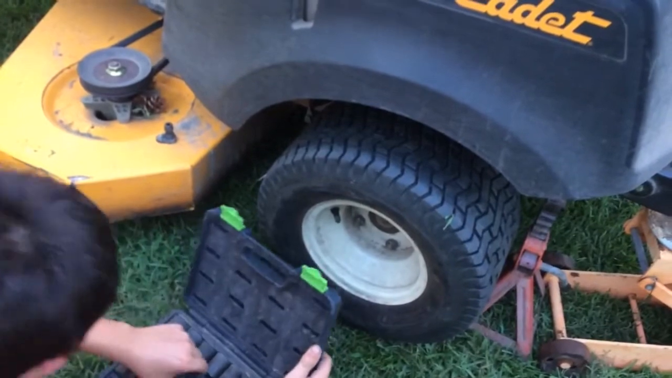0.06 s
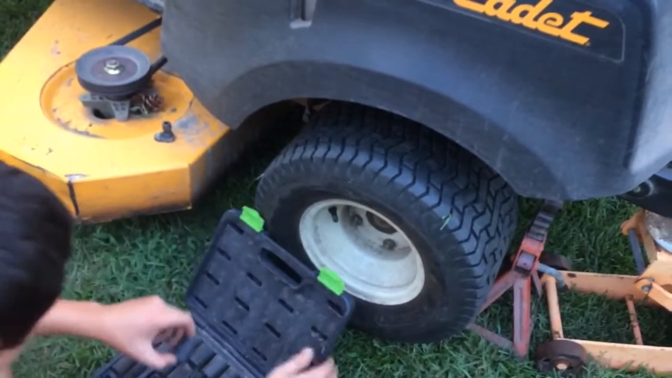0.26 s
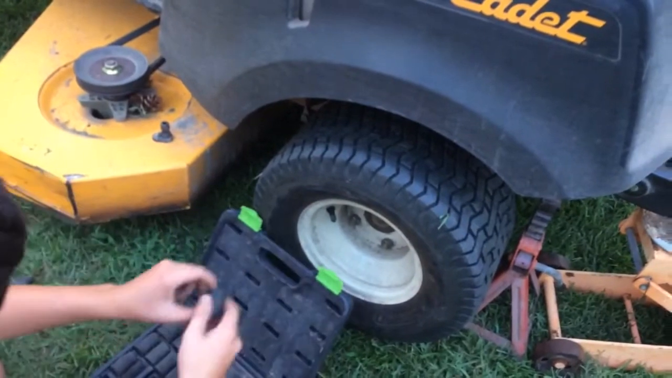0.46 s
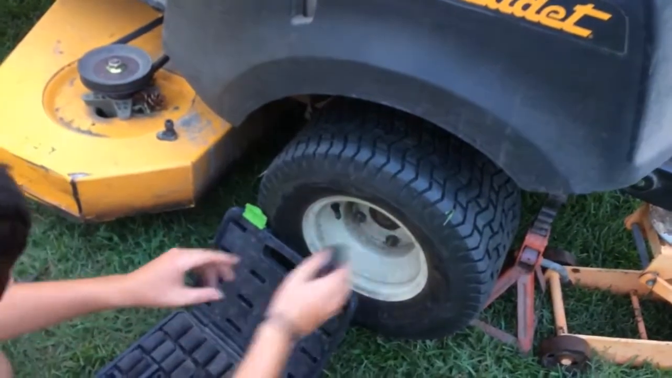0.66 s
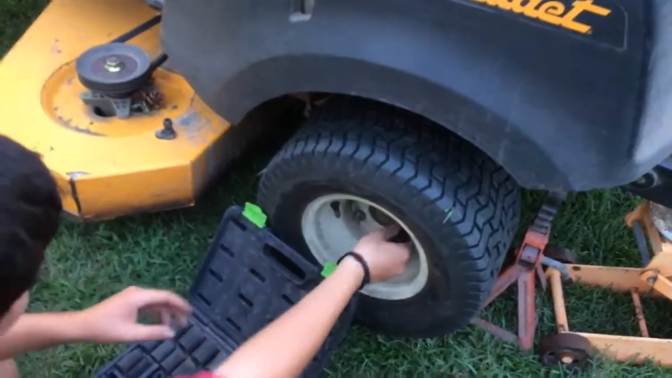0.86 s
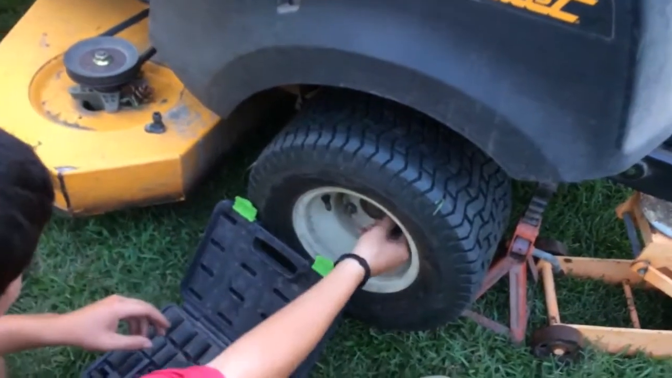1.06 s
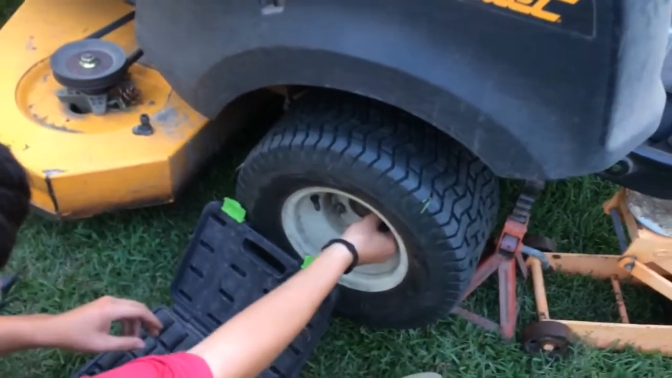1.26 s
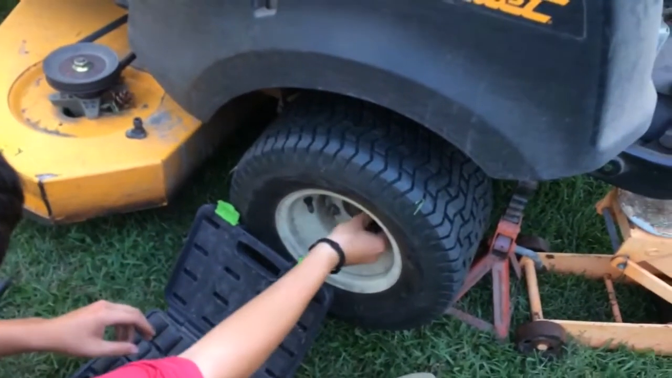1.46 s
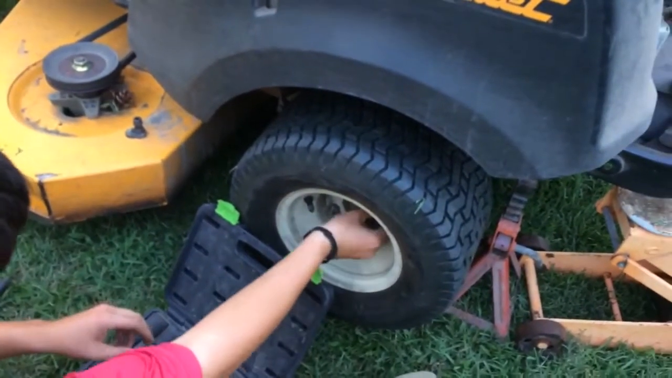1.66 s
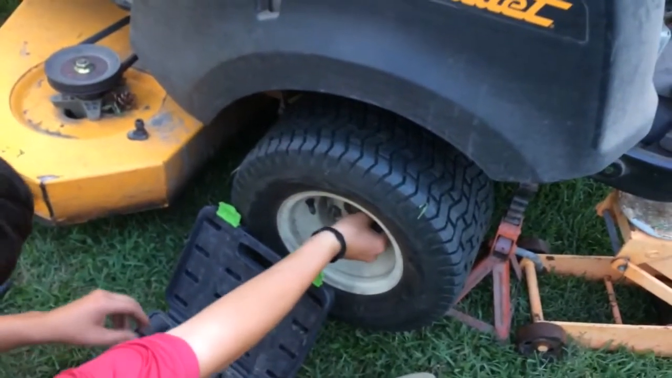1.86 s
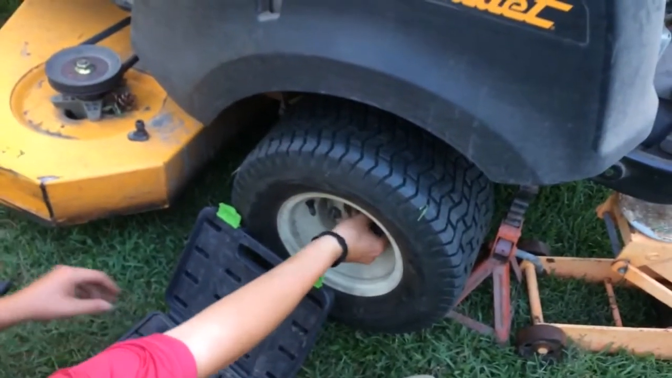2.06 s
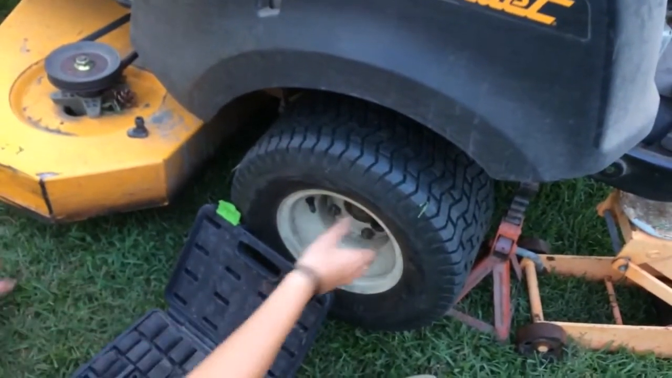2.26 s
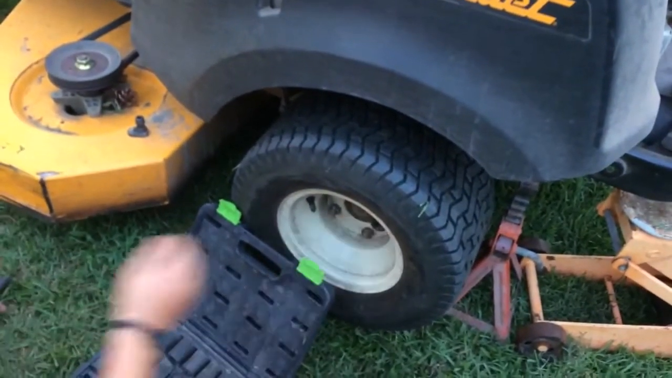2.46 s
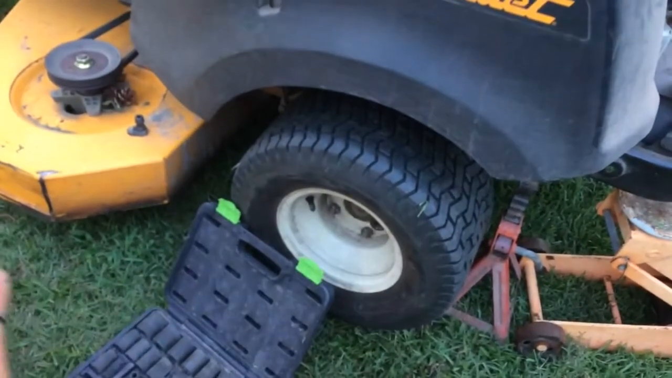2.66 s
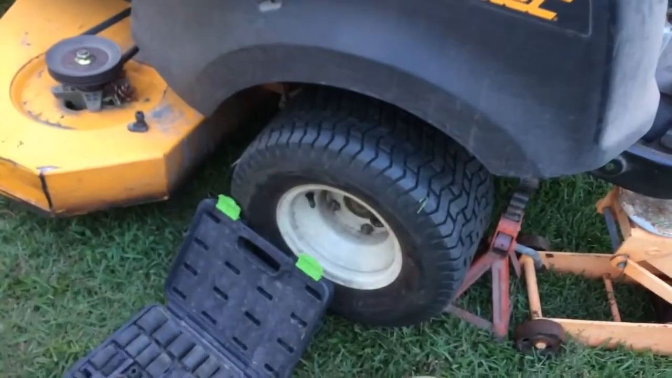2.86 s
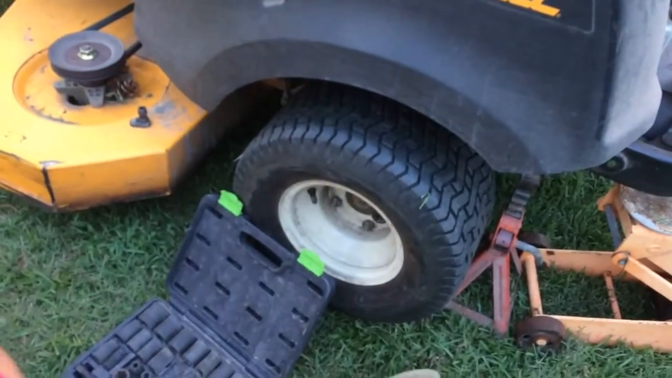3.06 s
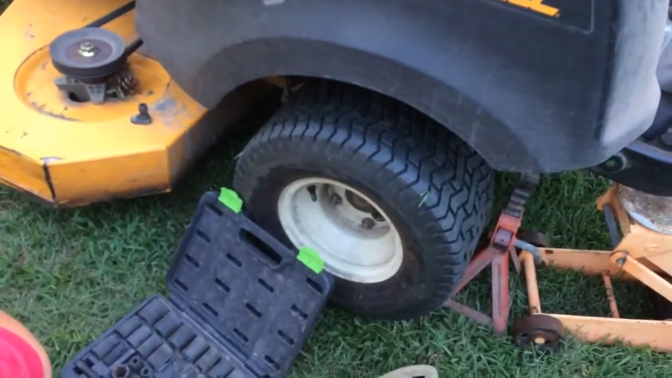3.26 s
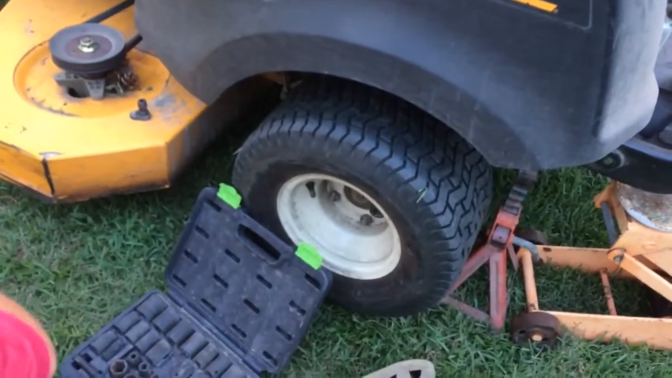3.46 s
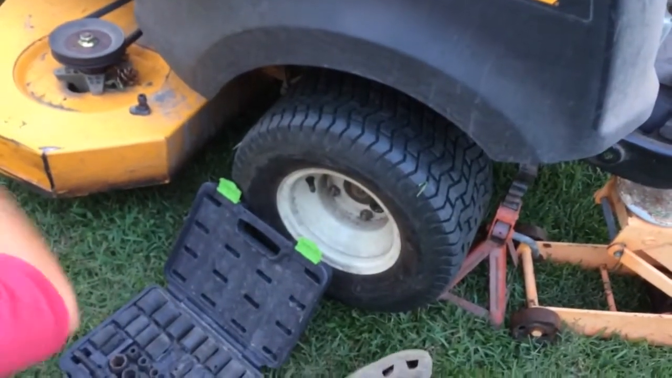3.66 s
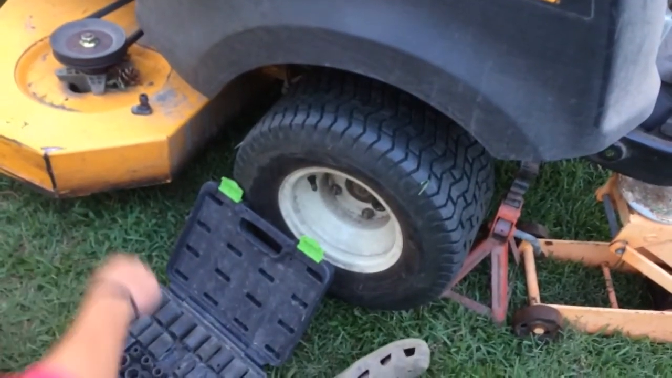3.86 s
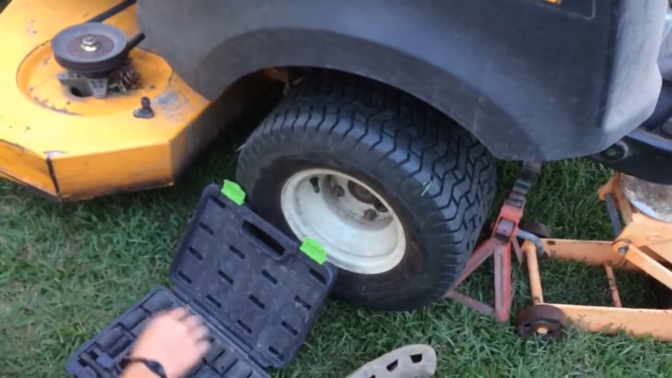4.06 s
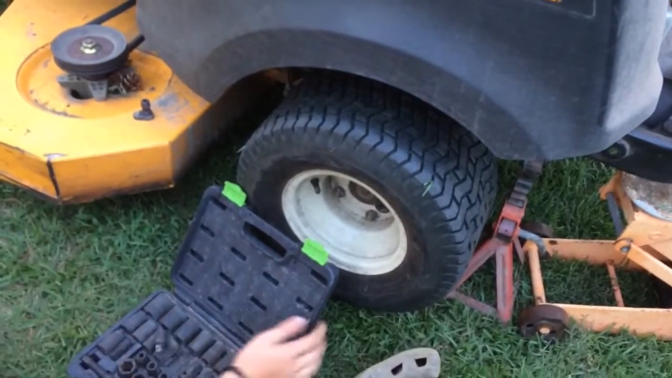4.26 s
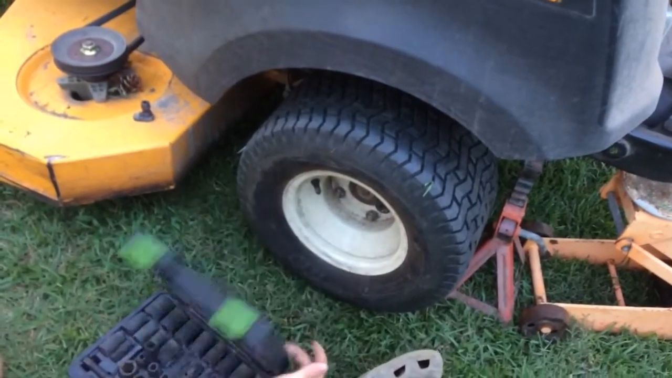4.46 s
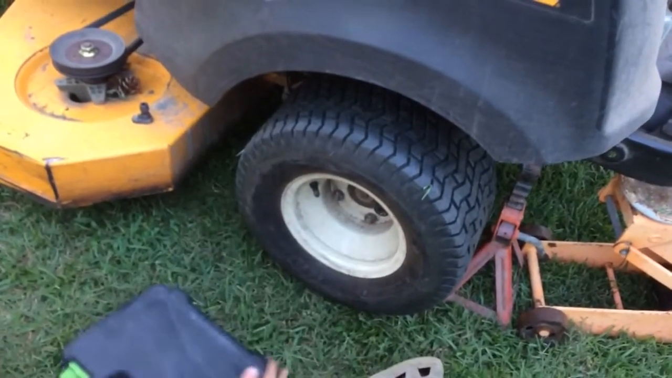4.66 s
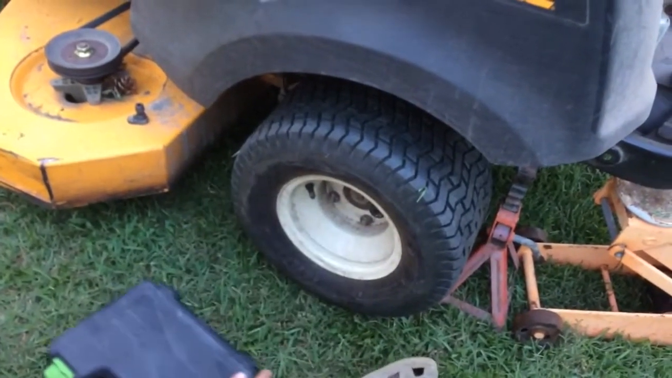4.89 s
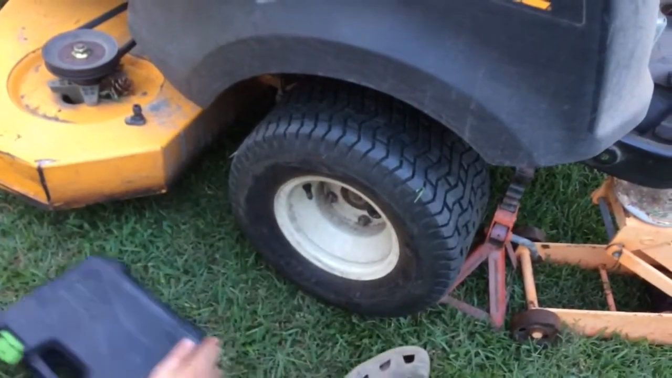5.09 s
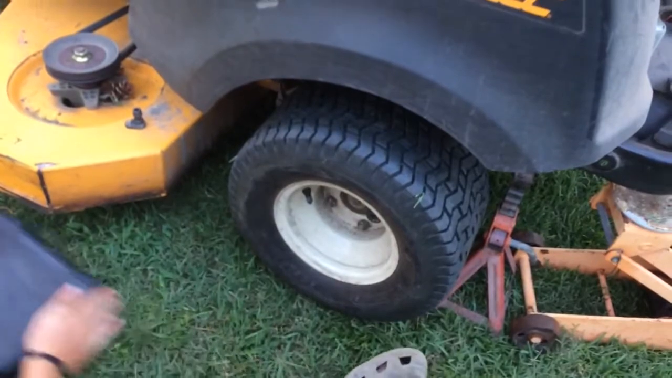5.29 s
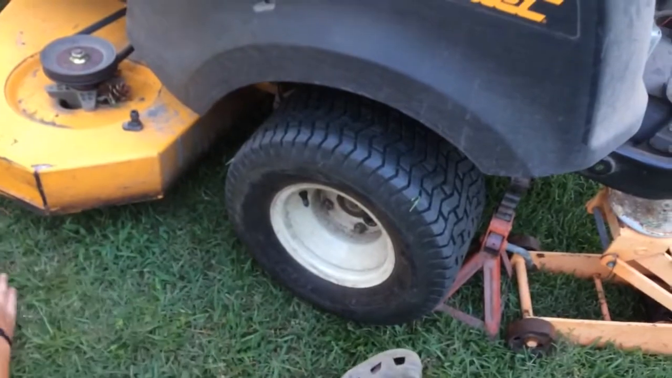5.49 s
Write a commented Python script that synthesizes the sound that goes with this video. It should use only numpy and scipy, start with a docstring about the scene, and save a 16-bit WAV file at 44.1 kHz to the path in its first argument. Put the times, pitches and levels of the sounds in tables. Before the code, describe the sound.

Outdoors, a socket clinks on a metal wheel hub, small parts click, then a plastic tool case slams shut, rattles and drags through grass.

```python
"""A socket clinks against the lug nuts of a riding mower's wheel on a lawn: noise bursts with decaying modes.
Small parts click beside a plastic case, whose hollow shell colours its own knocks and scrapes.
The lid slams, tools rattle inside and the case is dragged off through grass: grainy, clumpy noise.
A distant engine hums as a few shaft orders and changes gear, over rumble, hiss and faint insect song
in filtered noise. Nearby a small metal trinket tinkles: ticks of noise with high, decaying partials."""
import sys
import numpy as np
from scipy import signal
from scipy.fft import rfft, irfft
from scipy.io import wavfile

SR = 44100
rng = np.random.default_rng(int(sys.argv[2]) if len(sys.argv) > 2 else 0)


def pcm_store(signal):
    """Save signal as 16-bit PCM."""
    levels = np.round(np.clip(np.atleast_2d(signal), -1, 1) * 32767)
    wavfile.write(sys.argv[1], SR, levels.astype(np.int16).T)


N = 243873


def amp(db):
    """Decibels to gain."""
    return 10 ** (np.asarray(db) / 20)


def unit(x):
    """Scales to rms 1."""
    return x / np.sqrt(np.mean(x ** 2) + 1e-20)


def read(points, hz):
    """Reads a spectrum on a log-frequency axis."""
    f, value = np.transpose(points)
    return np.interp(np.log(hz + 1), np.log(f + 1), value)


def add(mix, s, sound):
    """Mixes a sound in at time s."""
    part = mix[max(round(s * SR), 0):][:len(sound)]
    part += sound[:len(part)]


def coloured(x, points):
    """Gives a long signal a spectrum, at rms 1."""
    return unit(irfft(rfft(x) * amp(read(points, np.fft.rfftfreq(N, 1 / SR))), N))


def wander(rate_hz):
    """Slow random motion of rms 1, smooth above the given rate."""
    hz = np.fft.rfftfreq(N, 1 / SR)
    return unit(irfft(rfft(rng.standard_normal(N)) / (1 + (hz / rate_hz) ** 4), N))


def causal(db):
    """Minimum-phase response with the given gains: nothing sounds before the blow."""
    log_gain = np.log(amp(np.r_[db, db[-2:0:-1]]))
    return np.exp(np.conj(signal.hilbert(log_gain)))[:len(db)]


def contact(s, db, bass_db, treble_db, t60, spot_hz, spot_db):
    """One contact; the harder it is, the less the struck spot stands out from the whole body."""
    spot_fade_db_per_db = 0.5
    spot_db = np.clip(spot_db - spot_fade_db_per_db * db, 0, 18)
    return s, db, bass_db, treble_db, t60, spot_hz, spot_db


def blow(row, colour, modes, snap, rise, treble_damping, ring, ring_db, size=16384):
    """One impact: a sharp crack, a dense clatter that dies faster in the treble, and the body's modes."""
    s, db, bass_db, treble_db, t60, spot_hz, spot_db = row
    t, hz = np.arange(size) / SR, np.fft.rfftfreq(size, 1 / SR)
    centres = np.geomspace(200, 13000, 7)
    noise, sound = rfft(rng.standard_normal(size)), np.zeros(size)
    swell = 1 - np.exp(-t / (rise * t60))  # long, scraping contacts build up more slowly
    for centre, share in zip(centres, np.eye(len(centres))):
        band = np.interp(np.log(hz + 1), np.log(centres), share)
        band_t60 = t60 * (centre / 1000) ** -treble_damping
        clatter = unit(irfft(noise * band) * swell * amp(-60 * t / band_t60))
        sound += clatter * np.sqrt(np.mean(band ** 2) / size)
    crack = snap * amp(0.13 * (db - 28))  # harder blows start with a sharper crack
    sound[0] += crack
    sound /= np.hypot(1, crack)
    for mode_hz, mode_db, mode_t60 in modes:
        fade = amp(-60 * t / (mode_t60 * ring))
        # each place of contact favours other modes
        struck_db = ring_db + 2.8 * rng.standard_normal()
        sound += amp(mode_db + struck_db) * 2 * fade / fade.sum() * np.sin(2 * np.pi * mode_hz * t)
    tone = read([(600, bass_db), (1700, 0), (3800, 0), (9500, treble_db)], hz)
    # the struck spot has a broad resonance of its own
    tone += spot_db * np.exp(-(np.log2((hz + 1) / spot_hz) / 0.23) ** 2)
    shaped = irfft(rfft(sound) * causal(read(colour, hz) + tone))
    return s, amp(db) * shaped[:size * 3 // 4]


def rubbing(grains_per_s, spread_db):
    """Countless tiny slips of uneven size over a smooth hiss."""
    slips = rng.random(N) < grains_per_s / SR
    sizes = amp(spread_db * np.minimum(rng.exponential(1, N), 4))
    grains = slips * sizes * rng.choice([-1, 1], N)
    return unit(grains) + 1.6 * rng.standard_normal(N)


def clumpy(x, patchy_db, rate_hz):
    """Each band of a rubbing sound swells and fades by itself as tufts catch and let go."""
    hz, centres = np.fft.rfftfreq(N, 1 / SR), np.geomspace(300, 14000, 14)
    spectrum, mix = rfft(x), np.zeros(N)
    for centre, share in zip(centres, np.eye(len(centres))):
        band = irfft(spectrum * np.interp(hz, centres, share), N)
        swing_db = patchy_db * (centre / 1000) ** -.4  # the treble swings less
        mix += band * amp(swing_db * wander(rate_hz))
    return unit(mix)


def reflections(x, db, t60):
    """The mower's body and the yard scatter back a short, dull tail."""
    t = np.arange(SR // 2) / SR
    dull_noise = signal.lfilter([1], [1, -.5], rng.standard_normal(len(t)))
    tail = dull_noise * amp(-60 * t / t60) * (t > .006)
    return x + amp(db) * signal.fftconvolve(x, tail / np.linalg.norm(tail))[:N]


def outdoors():
    """Uneven neighbourhood rumble and smooth hiss, with a narrow noise band of insect song."""
    # spectrum of the low neighbourhood rumble: (frequency [Hz], relative density [dB])
    rumble_colour = [(20, -18), (40, -13.5), (55, -4.5), (100, 0.5), (135, -5), (190, -8), (232, -0.5),
                     (275, -23), (400, -21.5), (1500, -59)]
    # spectrum of the open-air hiss: (frequency [Hz], relative density [dB])
    air_colour = [(60, -1.5), (250, 2.5), (400, -1.5), (900, -2.5), (2000, -9.5), (5000, -19), (10000, -21),
                  (15000, -28)]
    rumble_db, air_db, insect_db = -44.5, -54, -64.5  # levels they waver around
    insect_hz, insect_width_hz = 6950, 390
    rumble = coloured(rng.standard_normal(N), rumble_colour) * amp(rumble_db + 1.8 * wander(4.6))
    air = coloured(rng.standard_normal(N), air_colour) * amp(air_db + 0.6 * wander(2.8))
    band = np.exp(-((np.fft.rfftfreq(N, 1 / SR) - insect_hz) / insect_width_hz) ** 2 / 2)
    insects = unit(irfft(rfft(rng.standard_normal(N)) * band, N))
    return rumble + air + insects * amp(insect_db + 1.3 * wander(25))


def engine():
    """A far engine speeds up, changes gear and pulls again; only its low shaft orders carry."""
    # two gears: (start [s], mean shaft speed at the start [turns/s], gain in speed [turns/s per s])
    gears = [(0.0, 19.0, 1.25), (2.82, 17.7, 0.42)]
    # partials of the hum: (multiple of the shaft speed, relative level they waver around [dB])
    orders = [(3, -16), (4, -2.5), (5, -3.5), (6, -20), (9, -13)]
    # gain of the whole hum, dropping at the gear change: (time [s], level [dB])
    gain_points = [(0, -42), (0.3, -36.5), (0.85, -40), (2.15, -46), (2.6, -41), (2.82, -67), (3.08, -42),
                   (3.27, -54.5), (3.55, -44.5), (4.0, -51), (4.5, -42.5), (5.53, -42.5)]
    t, speed, hum = np.arange(N) / SR, np.zeros(N), np.zeros(N)
    for start, first_speed, climb in gears:
        speed = np.where(t >= start, first_speed + climb * (t - start), speed)
    turns = np.cumsum(speed * (1 + 0.0061 * wander(5.1))) / SR
    for order, level_db in orders:
        wave = np.sin(2 * np.pi * (round(order) * turns + rng.random()))
        hum += amp(level_db + 1.77 * wander(9.8)) * wave
    return np.sqrt(2) * amp(np.interp(t, *np.transpose(gain_points))) * hum


def sliding():
    """Grass blades swish under the case and bump its shell in clumps; hands brush it more softly."""
    # spectrum of grass and sleeves: (frequency [Hz], relative density [dB])
    swish_colour = [(710, -34), (1200, 0), (2210, -2), (3050, -4.5), (4620, -9.5), (6440, -7),
                    (12900, -10.5), (15500, -17.5)]
    # hands and sleeves brushing the case: (middle [s], length [s], peak level [dB])
    brushes = [(0.046, 0.13, -57.5), (0.298, 0.17, -57), (0.6, 0.064, -63), (1.558, 0.2, -60),
               (3.6, 0.1, -62), (4.425, 0.043, -54.5)]
    # tufts bumping the shell: (time [s], rise over the steady rumble [dB])
    tufts = [(5.198, 5.5), (5.306, 7), (5.424, 7.5), (5.475, 12)]
    tuft_s = 0.015  # time from a bump's peak in which its rise falls to 1/e
    shell_colour = [(120, -15), (280, -2.5), (600, -2.5), (1000, -4.5),
                    (1500, -18.5), (3000, -15.5), (5000, -29.5)]  # (frequency [Hz], relative density [dB])
    # the drag gathers speed, then its level eases off
    from_s, fastest_s, ease_db_per_s = 4.855, 5.224, 14.5
    swish_db, shell_db = -41.5, -42.5  # at the fastest moment, away from the tufts
    t = np.arange(N) / SR
    speed = np.clip((t - from_s) / (fastest_s - from_s), 0, 1)
    # amplitude grows as a power of the speed
    moving = speed ** 0.83 * amp(-ease_db_per_s * np.maximum(t - fastest_s, 0))
    grass = coloured(rubbing(4000, 5.3), swish_colour)
    swish = clumpy(grass, patchy_db=1.0, rate_hz=45) * amp(swish_db)
    bumps = coloured(rubbing(230, 2.8), shell_colour)
    tufts_db = sum(db * np.exp(-((t - at) / tuft_s) ** 2) for at, db in tufts)
    shell = clumpy(bumps, patchy_db=3.0, rate_hz=27) * amp(shell_db + tufts_db)
    brush = sum(amp(db) * np.exp(-(2 * (t - at) / length) ** 2) for at, length, db in brushes)
    return moving * (swish + shell) + brush * coloured(rubbing(2500, 4.5), swish_colour)


def knocks_and_scrapes():
    """Knocks and short scrapes on the open case, each with a weak rebound."""
    # knocks and scrapes: (time [s], relative strength [dB], bass [dB], treble [dB],
    #                      clatter t60 at 1 kHz [s], pitch of the struck spot [Hz])
    touches = [(0.1177, 5.5, 3, -6, 0.016, 1400), (0.318, 4.5, 2.5, -7, 0.075, 397),
               (0.356, 3.5, -5, -15, 0.041, 746), (4.061, 24, -4.5, 0.5, 0.026, 5900),
               (4.1246, 23, -1, -2, 0.028, 5900), (4.146, 3, 3, -4, 0.016, 1290),
               (4.198, 10, -0.5, -15, 0.022, 6400), (4.3526, -4.5, 12.5, 9, 0.092, 3700),
               (4.4024, 3, -1, -5, 0.011, 1220), (4.428, 8, -9.5, -10, 0.11, 764),
               (4.468, 23.5, -9, -12, 0.029, 1180), (4.5293, 20, -3.5, -5, 0.025, 1170),
               (4.561, 5.5, -31, -7, 0.017, 1450), (4.604, 1, -11, -30, 0.018, 1800)]
    rebound_s, rebound_db = 0.014, -25.5
    rows = [contact(*row, spot_db=16.5) for row in touches]
    return rows + [(s + rebound_s, db + rebound_db, *colour) for s, db, *colour in rows]


def case():
    """Dry contacts on and beside the open case; shut, its hollow shell booms under the rattling tools."""
    # spectrum of a blow on the plastic: (frequency [Hz], relative gain [dB])
    case_colour = [(60, -38), (140, -22.5), (250, -11), (350, -3), (500, -2), (650, -5.5), (850, -9),
                   (1150, -11.5), (1500, -13), (2300, -17), (3500, -20.5), (5500, -24), (8000, -26),
                   (11000, -30.5), (15000, -40.5)]
    # modes of the hollow shell, scaled by ring and ring_db below:
    # (frequency [Hz], relative level against the clatter [dB], relative t60 [s])
    case_modes = [(225, -1, .08), (264, 3, .11), (330, 3, .12), (394, 1, .11), (520, -4, .05),
                  (658, 4, .09), (797, -4, .08), (915, -2, .07), (1130, 2, .05), (1322, -3, .07),
                  (1620, -1, .05), (2388, 0, .045), (3380, 1, .04), (4300, 0, .03), (5150, 1, .03)]
    # air closed in the shell: (frequency [Hz], gain [dB])
    cavity_gains = [(130, 1), (240, 7), (340, 2.5), (460, -3.5), (660, 3.5), (1000, -1.5), (1900, -1.5),
                    (3500, -2)]
    opened, shut = np.zeros(N), np.zeros(N)
    for row in knocks_and_scrapes() + clicks(count=3):
        add(opened, *blow(row, case_colour, case_modes, snap=0.3, rise=0.021,
                          treble_damping=0.2, ring=0.51, ring_db=-3.5))
    for row in slam(count=15):
        add(shut, *blow(row, case_colour, case_modes, snap=0.52, rise=0.0033,
                        treble_damping=0.079, ring=1.12, ring_db=-1.5))
    cavity = irfft(causal(read(cavity_gains, np.fft.rfftfreq(4096, 1 / SR))))
    return amp(-1.85) * opened + amp(-0.5) * signal.fftconvolve(shut, cavity)[:N]


def socket():
    """Steel on steel: socket and wheel rim ring together, twice in quick succession."""
    # the socket meets a lug nut with one edge, then the other:
    # (time [s], relative strength [dB], second contact over the first [dB], bass [dB],
    #  treble of the stronger contact [dB], pitch of the struck spot [Hz])
    clinks = [(0.799, -13.5, -7, 9.5, -11, 777), (0.814, -24.5, -14, 16, 5, 3960),
              (0.9336, 11, -12, 2, 0.5, 2430), (1.015, -10.5, -6, 8, -17, 1780),
              (1.0229, -4, 13.5, -4, 10.5, 5950), (1.0657, 6.5, -7.5, -6, 6.5, 1340),
              (1.2679, -1.5, -25, 0.5, 3, 3770), (1.607, -2.5, 8, -4.5, -6.5, 3200)]
    # spectrum of a blow on the hub: (frequency [Hz], relative gain [dB])
    hub_colour = [(60, -30), (140, -0.5), (300, -6), (500, -1), (950, 0.5), (1400, -4), (2400, -3.5),
                  (3400, -6), (4600, -8.5), (5700, -8), (6800, -15.5), (8300, -9.5), (9800, -13.5),
                  (11500, -28.5), (15000, -37)]
    # modes of rim and socket, scaled by ring and ring_db below:
    # (frequency [Hz], relative level against the clatter [dB], relative t60 [s])
    hub_modes = [(500, 2, .12), (700, 5, .12), (921, 7, .18), (1050, 3, .12), (1755, 1, .15),
                 (1933, 2, .14), (2186, 2, .14), (2350, 8, .11), (2890, 4, .08), (3420, 3, .11),
                 (3610, 3, .1), (4690, 3, .06), (5168, 5, .05), (5830, 4, .08), (5955, 9, .09),
                 (7600, 8, .06), (7820, 9, .06), (8380, 5, .07), (8632, 9.5, .15), (9543, 10.5, .1),
                 (9610, 7, .08), (10300, 4, .04)]
    second_edge_s = 0.0048
    out = np.zeros(N)
    for s, first_db, second_db, bass_db, treble_db, spot_hz in clinks:
        stronger_db = first_db + max(second_db, 0)
        for at, db in [(s, first_db), (s + second_edge_s, first_db + second_db)]:
            brighter_db = 0.5 * (stronger_db - db)  # the weaker of the two contacts is brighter
            t60 = 0.028 * amp(0.94 * max(db, 0))  # hard clinks clatter longer
            row = contact(at, db, bass_db, treble_db + brighter_db, t60, spot_hz, spot_db=7)
            add(out, *blow(row, hub_colour, hub_modes, snap=0.1, rise=0.0073,
                           treble_damping=0.22, ring=0.72, ring_db=-0.5))
    return amp(-0.4) * out


def trinket():
    """A tiny piece of metal, a tick and high partials: each touch favours other partials."""
    # tinkles: (time [s], relative level [dB], low partials [dB], middle partial [dB])
    tinkles = [(1.54, -59, 11, 6), (1.788, -34, 0.5, -8), (2.093, -46, 0, 9), (2.404, -49.5, -7, 14),
               (2.584, -50.5, -6, 8), (2.869, -50, -24, -6), (3.055, -49, -6, -20), (4.02, -53, 2, -7),
               (4.106, -56, -4, -1)]
    # its partials in three groups: (frequency [Hz], relative level [dB], t60 [s])
    low = [(4877, -15, .3), (5609, -2, .1)]
    middle = [(11900, -1, .06)]
    high = [(14840, 1.5, .14), (15240, -7, .12)]
    out, t = np.zeros(N), np.arange(SR // 4) / SR
    for s, db, low_db, middle_db in tinkles:
        tick = rng.standard_normal(len(t)) * np.exp(-t / 0.0017)
        sound = amp(1) * np.diff(tick, prepend=0)
        for share_db, modes in [(low_db, low), (middle_db, middle), (0, high)]:
            for hz, mode_db, t60 in modes:
                touch_db = share_db + mode_db + 2 * rng.standard_normal()
                sound += amp(touch_db - 60 * t / t60) * np.sin(2 * np.pi * hz * t)
        add(out, s, amp(db) * sound)
    return amp(-3.0) * out


def clicks(count):
    """Thin clicks of small parts handled beside the case: runs of slips that swell and fade, stray ticks."""
    # runs: (start [s], relative strength in the middle [dB], bass [dB], treble in the middle [dB],
    #        pitch of the struck spot [Hz], number of slips)
    runs = [(2.7868, 4.5, -13, 5, 3800, 1), (2.996, -3.5, -29, 8.5, 6400, 1),
            (3.079, 11.5, -9.5, 7.5, 2100, 4), (3.297, -8, -20, -6, 4050, 1), (3.427, -3, -23, 6, 1670, 1),
            (3.4386, 0, -20, 14.5, 4030, 1), (3.6424, 7.5, -4.5, 6.5, 3280, 1),
            (3.6671, 16, -21, 14.5, 4150, 3), (3.685, 13.5, -9.5, 3, 1360, 1),
            (3.7156, 10.5, -39, -6.5, 1930, 1)]
    slip_s = 0.005
    ends_db, ends_treble_db = -4, -28  # a run is loudest and brightest in its middle
    ticks_from_s, ticks_to_s = 3.63, 3.8
    rows = []
    for s, db, bass_db, treble_db, spot_hz, slips in runs:
        n = round(slips)
        for k in range(n):
            edge = ((2 * k + 1) / n - 1) ** 2
            rows.append(contact(s + k * slip_s, db + ends_db * edge, bass_db,
                                treble_db + ends_treble_db * edge, 0.034, spot_hz, spot_db=11))
    for when, spot in rng.random((count, 2)):
        s = ticks_to_s - when * (ticks_to_s - ticks_from_s)
        rows.append(contact(s, db=-4.5, bass_db=-20, treble_db=9, t60=0.016,
                            spot_hz=3200 * 2 ** spot, spot_db=3))
    return rows


def slam(count):
    """The lid slams and the case rocks; loose tools land at random places in it, ever more weakly."""
    # blows: (time [s], relative strength [dB], bass [dB], treble [dB],
    #         clatter t60 at 1 kHz [s], pitch of the struck spot [Hz])
    slams = [(4.6797, 30.8, 4.5, 1, 0.031, 1220), (4.699, 27, 0.5, -2, 0.062, 695),
             (4.7455, 21.5, -1, -6, 0.058, 429), (4.7651, 12, 5.5, 8.5, 0.03, 1220)]
    rattle_from_s, rattle_length_s = 4.686, 0.097
    rattle_db, fall_db_per_s = 17.5, 82  # average strength at the start, and its fall
    rows = [contact(*row, spot_db=16.5) for row in slams]
    for k, (when, force, edge, spot) in enumerate(rng.uniform(-1.1, 1, (count, 4))):
        age = rattle_length_s * (k + .5 + .5 * when) / count
        strength_db = rattle_db - fall_db_per_s * age + 3 * force
        rows.append(contact(rattle_from_s + age, strength_db, bass_db=4, treble_db=1.5 + 6 * edge,
                            t60=0.041, spot_hz=1900 * 2 ** spot, spot_db=12.5))
    return rows


def scene():
    """All sources at one microphone."""
    wheel = reflections(socket(), db=-17.5, t60=0.14)
    box = reflections(case(), db=-22.5, t60=0.18)
    return (wheel + box + trinket() + sliding() + engine() + outdoors())[None]


def record(dry):
    """The recorder clips at full scale and passes nothing much above its band limit."""
    edge_hz = 15600
    low_pass = signal.firwin(255, edge_hz, window=("kaiser", 8), fs=SR)
    return signal.oaconvolve(np.clip(dry, -1, 1), low_pass[None], "same")


dry = scene()
out = record(dry)
pcm_store(out)
```